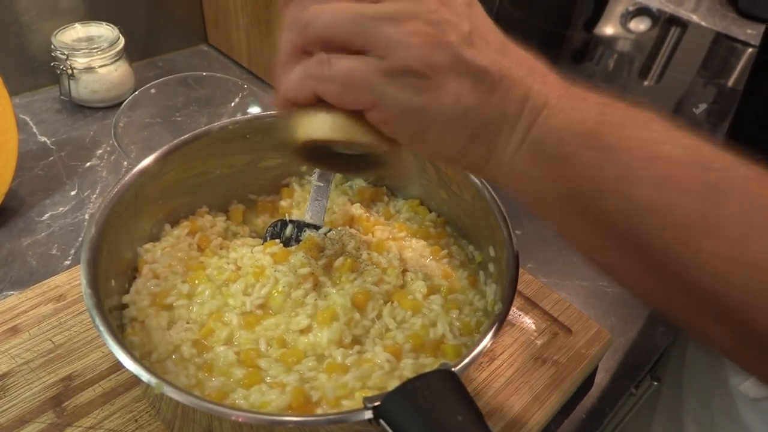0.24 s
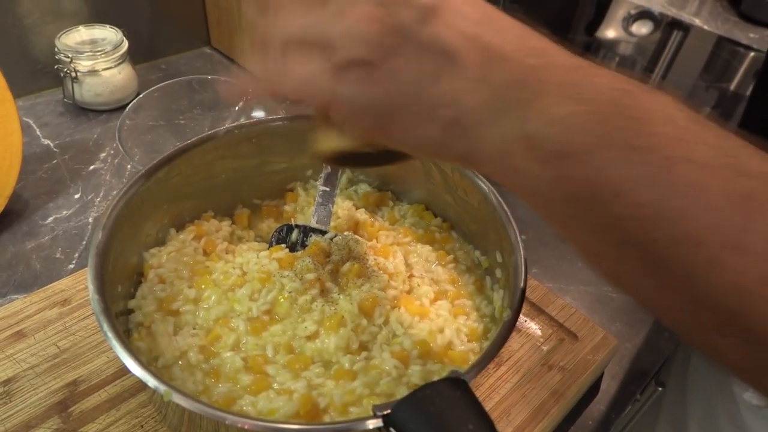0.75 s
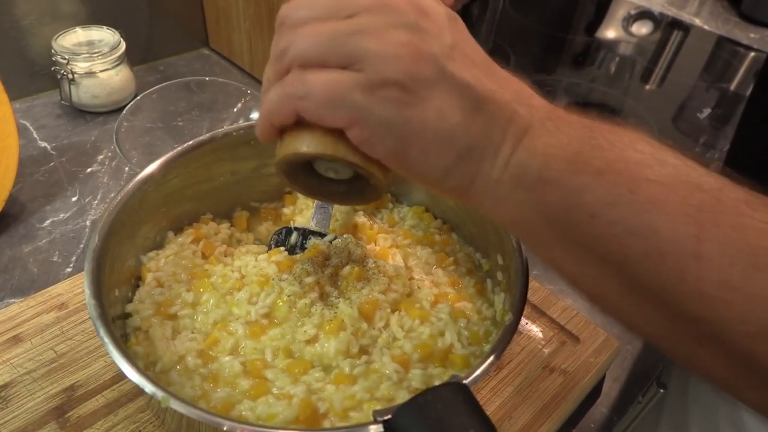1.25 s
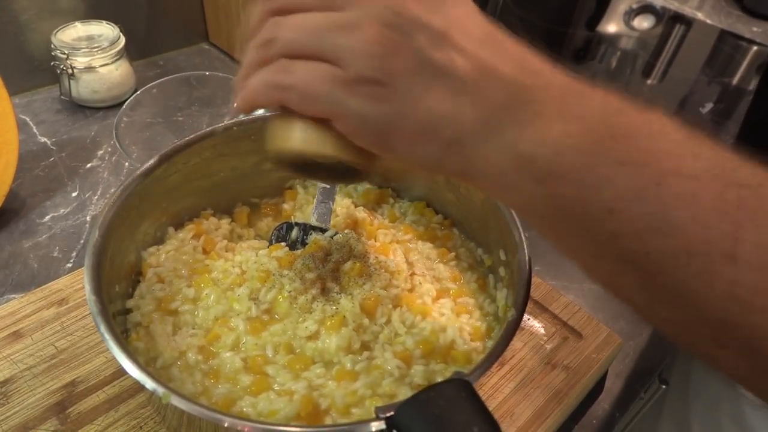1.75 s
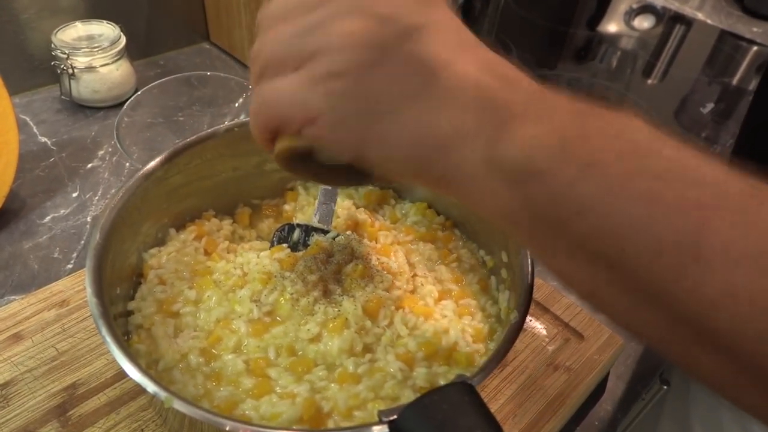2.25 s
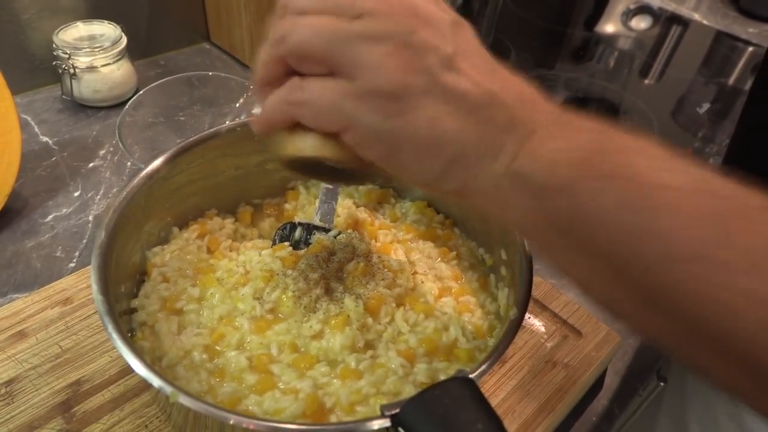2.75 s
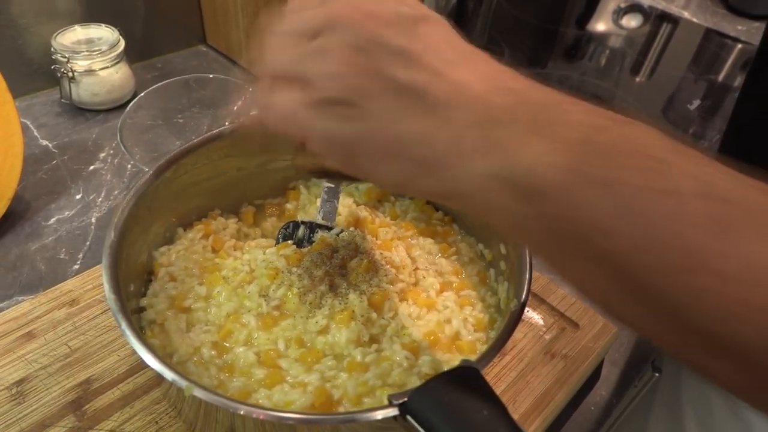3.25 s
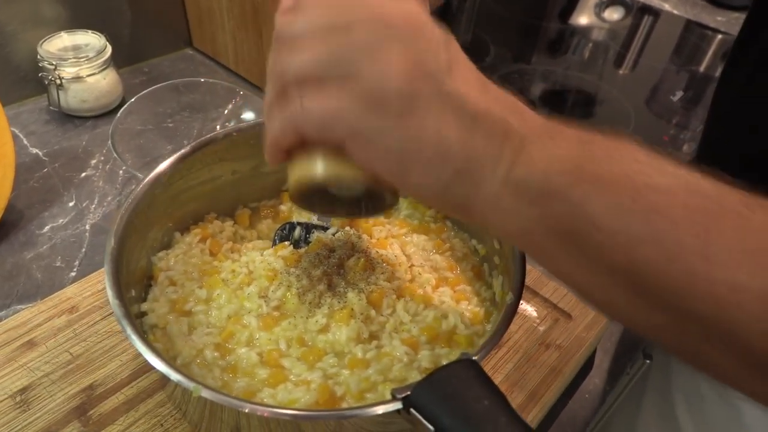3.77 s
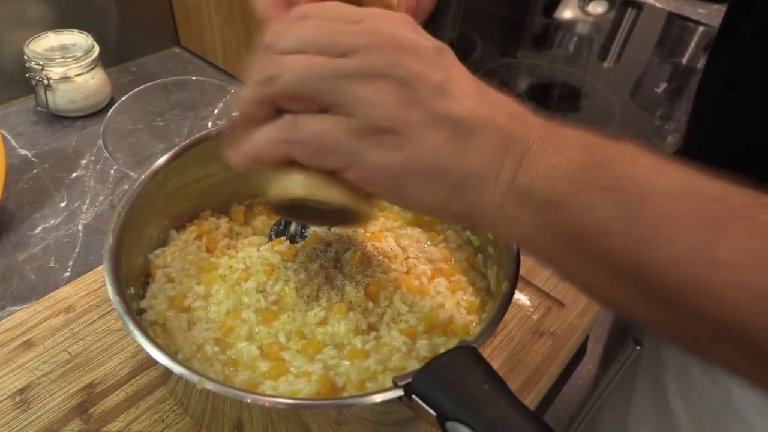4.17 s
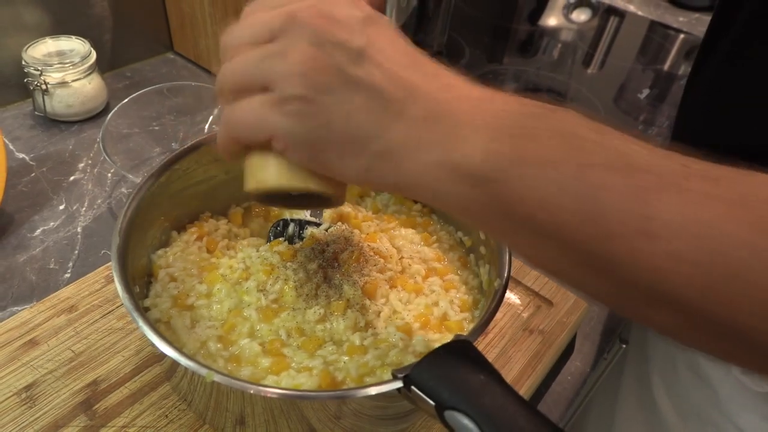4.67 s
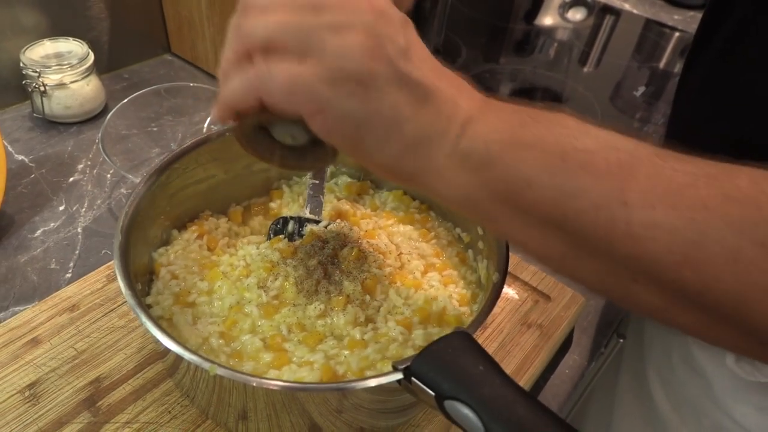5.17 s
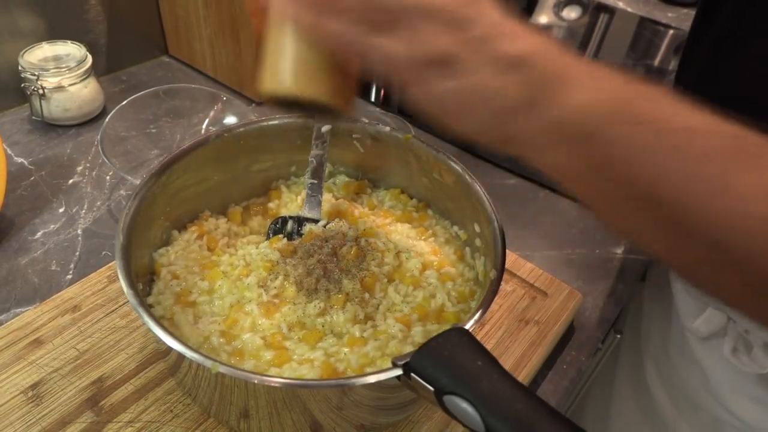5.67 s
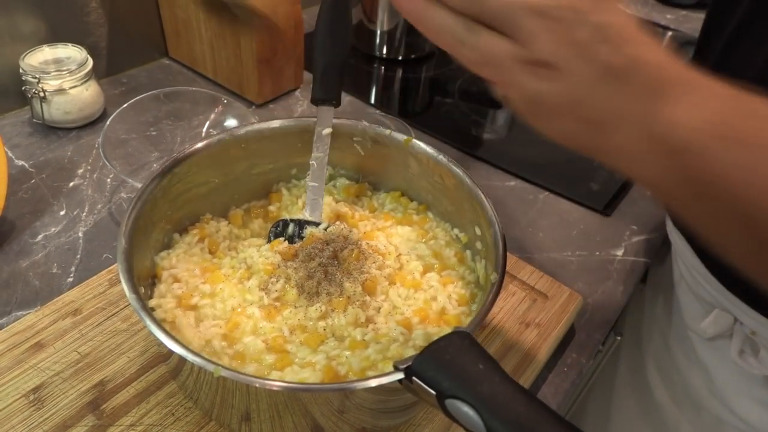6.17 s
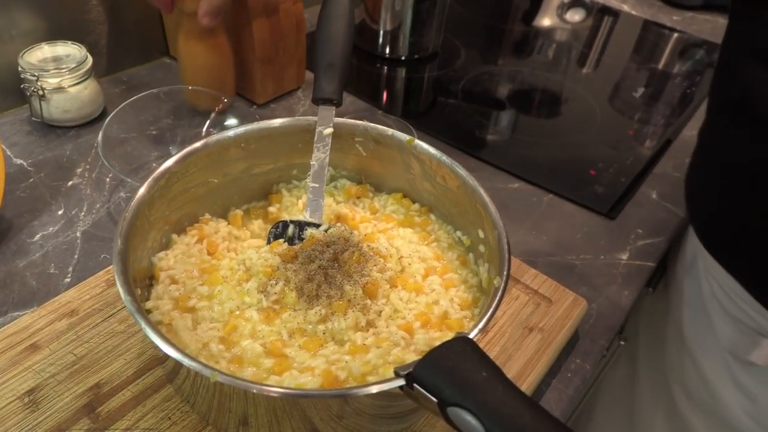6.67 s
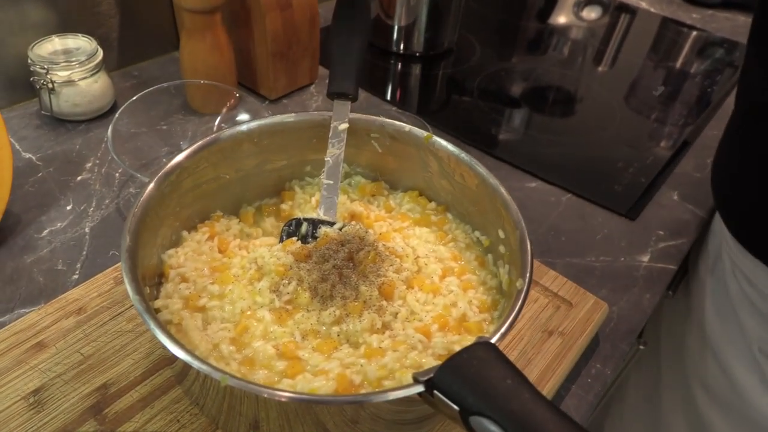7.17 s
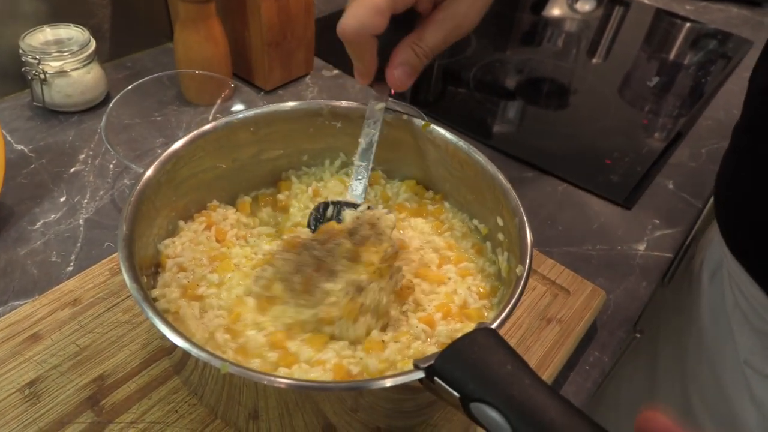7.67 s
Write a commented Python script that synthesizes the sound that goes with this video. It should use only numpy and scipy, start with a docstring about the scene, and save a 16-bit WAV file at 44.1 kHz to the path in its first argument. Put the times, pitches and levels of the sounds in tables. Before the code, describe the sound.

Peppercorns crunch rhythmically in a wooden mill, followed by two dull pats, a sharp knock on stone and a spoon stirring wet rice.

```python
"""A hard-walled kitchen, with an appliance humming far off. A wooden pepper mill is twisted sixteen
times over a pot: peppercorns crunch and crack, ringing its cavity, steel burr and wood. A palm slaps
the mill twice, it is set down on a stone counter and rocks once, then a spoon stirs sticky rice.
A close pair of microphones hears it from the right."""
import sys
import numpy as np
from scipy import signal
from scipy.fft import rfft, irfft, next_fast_len
from scipy.io import wavfile
from scipy.ndimage import uniform_filter1d, map_coordinates

SR = 44100
rng = np.random.default_rng(int(sys.argv[2]) if len(sys.argv) > 2 else 0)


def transcribe(signal):
    """Save signal, clipped to [-1, 1], as a 16-bit WAV file at the path in sys.argv[1]."""
    frames = np.atleast_2d(signal).T
    limited = np.clip(frames, -1, 1)
    pcm = np.round(limited * 32767).astype(np.int16)
    wavfile.write(sys.argv[1], SR, pcm)


N = 349051
T = np.arange(N) / SR


def amp(db):
    """Decibels to gain."""
    return 10 ** (np.asarray(db) / 20)


def unit(x):
    """Scaled to rms 1."""
    return x / np.sqrt(np.mean(x ** 2) + 1e-20)


def along(points, hz):
    """Interpolates (Hz, value) points on a log axis."""
    freqs, values = np.transpose(points)
    return np.interp(np.log(hz + 1), np.log(freqs + 1), values)


def balance(points):
    """Stereo response from (Hz, left minus right dB) points."""
    return lambda hz: amp(np.outer([.5, -.5], along(points, hz)))


def curves(rows):
    """One curve per column after the time; the first is -120 dB outside the rows."""
    times, db, *columns = np.transpose(rows)
    return [np.interp(T, times, db, -120, -120)] + [np.interp(T, times, c) for c in columns]


def fading(events, db_per_s):
    """Gain that jumps at each (s, dB), then decays."""
    return sum(amp(db - db_per_s * np.abs(T - s)) * (T >= s) for s, db in events)


def wobble(knots_per_s):
    """Smooth random curve."""
    return map_coordinates(rng.standard_normal(int(N * knots_per_s / SR) + 4), [T * knots_per_s])


def filtered(x, response):
    """Applies a complex frequency response."""
    size = next_fast_len(N + SR // 2)
    return irfft(rfft(x, size) * response(np.fft.rfftfreq(size, 1 / SR)), size)[..., :N]


def resonant(modes):
    """Response of (Hz, width Hz, dB) modes, Q at most 10; white noise keeps its level."""
    def shape(f):
        total = 0
        for k, (hz, width, db) in enumerate(modes):
            damping = 1j * f * max(width, hz / 10)
            total += (-1) ** k * amp(db) * damping / (hz * hz - f * f + damping)
        return total
    rms = np.sqrt(np.mean(abs(shape(np.linspace(0, SR / 2, 2000))) ** 2))
    return lambda f: shape(f) / rms


def grit(per_s, spread_db, clump_db):
    """Tiny random impulses of uneven size, in clumps."""
    hit = rng.random(N) < per_s / SR
    size = amp(spread_db * np.minimum(rng.exponential(size=N), 4.5) + clump_db * wobble(120))
    return unit(hit * size * rng.standard_normal(N))


def add(track, s, sound):
    """Mixes a sound into the track at time s."""
    part = track[..., round(s * SR):][..., :sound.shape[-1]]
    part += sound[..., :part.shape[-1]]


# Each row: frequency in Hz, relative noise density in dB.
AIR_SPECTRUM = [(26, -43), (45, -22), (65, -30.5), (139, -2), (275, -6.5), (662, -6.5), (866, -16),
                (1410, -12.5), (1640, -18), (2140, -15), (8410, -29.5), (9280, -29.5), (11300, -35.5),
                (15500, -56.5)]
# Each row: frequency in Hz, left-right correlation (clipped to -1..1).
AIR_CORRELATION = [(60, 0.12), (130, -0.28), (290, 0.36), (640, 0.78), (1410, -1.2), (3100, -0.48),
                   (6820, -0.03), (15000, 0.34)]
# Each row: frequency in Hz, left minus right in dB.
AIR_BALANCE = [(60, -5), (180, -3), (550, -5.5), (1650, -17.5), (4970, -6), (15000, 3.5)]


def room_air(level_db=-59.5):
    """Soft, slowly wavering noise, partly shared by both microphones."""
    def mid_side(hz):
        angle = np.arccos(np.clip(along(AIR_CORRELATION, hz), -1, 1)) / 2
        return amp(along(AIR_SPECTRUM, hz)) * [np.cos(angle), np.sin(angle)]
    mid, side = filtered(rng.standard_normal((2, N)), mid_side)
    air = filtered(np.array([mid + side, mid - side]), balance(AIR_BALANCE))
    return amp(level_db + 1.5 * wobble(2.1)) * unit(air)


# Each row: centre in Hz, width in Hz, level in dB.
HUM_BANDS = [(159.4, 11, -69), (305, 11.4, -72.5)]


def appliance_hum():
    """A distant appliance: narrow noise bands that waver."""
    out = np.zeros(N)
    for hz, width, db in HUM_BANDS:
        band = filtered(rng.standard_normal(N), lambda f: np.exp(-((f - hz) / width) ** 2))
        out += amp(db) * unit(band)
    return out


# Each row: time in s, relative level of the deep band in dB.
DEEP_RUMBLE = [(0, -74), (2.3, -67), (3.4, -72), (5.5, -67.5), (6.2, -74), (6.4, -81.5), (7.91, -75)]


def rumble(rest_db=-79.5, lag_s=.06, jolt_t60_s=.33):
    """Two low bands, mostly left; twists and knocks stir up the higher one."""
    def band(hz, log_width):
        noise = rng.standard_normal((2, N))
        return unit(filtered(noise, lambda f: np.exp(-(np.log((f + 1) / hz) / log_width) ** 2)))
    deep_db, = curves(DEEP_RUMBLE)
    shake = amp(-59.5 + .73 * (wrist_effort()[0] - FULL_CRUNCH_DB))
    shake = uniform_filter1d(shake, size=round(lag_s * SR))
    jolts = fading([(s, db - 47) for s, db, *_ in BASE_KNOCKS], 60 / jolt_t60_s)
    deep = amp(deep_db + 3 * wobble(4.9)) * band(21.2, .44)
    upper = (amp(rest_db) + shake + jolts) * amp(2.9 * wobble(6.2)) * band(90, .64)
    return (deep + upper) * amp([[5.5], [-11]])


# Each row: frequency in Hz, reverberation T60 in s.
WALL_DECAY = [(150, 0.25), (600, 0.53), (2000, 0.6), (5000, 0.47), (12000, 0.36)]


def wall_reverb(x):
    """Diffuse tails off hard walls; each 0.3 s of sound meets a new one."""
    out, step = np.zeros((2, N)), int(.3 * SR)
    for start in range(0, N, step):
        hz, t, spectra = signal.stft(rng.standard_normal((2, SR * 3 // 4)), SR, nperseg=256)
        decay = amp(-60 * t / along(WALL_DECAY, hz)[:, None])
        tail = signal.istft(spectra * decay, SR, nperseg=256)[1]
        tail /= np.linalg.norm(tail[0])
        add(out, start / SR + .005, signal.fftconvolve(x[None, start:start + step], tail, axes=1))
    # Long waves reach both microphones alike.
    out += filtered(out[::-1] - out, lambda hz: 1 / (1 + (hz / 600) ** 2)) / 2
    colour_hz_db = [(200, -7.5), (1000, -2.5), (3000, -6), (10000, -5.5)]
    return filtered(out, lambda hz: amp(along(colour_hz_db, hz)))


# Each row: frequency in Hz, left minus right in dB.
MIC_BALANCE = [(100, -6), (300, 5.5), (700, -8), (1400, -6.5), (2000, -12), (3000, -10.5), (4500, -6.5),
               (8000, -12), (15000, 4)]
# Pot and counter echoes, left list then right. Each row: delay in ms, gain in dB.
NEAR_ECHOES = [
    [(.6, -10), (1.5, -8), (2.9, 0.5)],
    [(.9, -25), (2.1, -15.5), (3.6, -12.5)],
]


def mic_pair(hz, left_lead_ms=.076):
    """Response of each capsule; small nearby things reflect only short waves."""
    treble = hz ** 2 / (hz ** 2 + 1200 ** 2)
    echoes = [1 + treble * sum(amp(db) * np.exp(-2j * np.pi * hz * ms / 1000) for ms, db in side)
              for side in NEAR_ECHOES]
    lead = np.exp(1j * np.pi * np.outer([1, -1], hz) * left_lead_ms / 1000)
    return balance(MIC_BALANCE)(hz) * lead * echoes


# Each row: start in s, level in dB.
SPOON_PUSHES = [(7.366, -51), (7.58, -68.5), (7.642, -57.5)]
# Each row: start in s, level in dB, pitch in Hz.
GRAIN_SMACKS = [(7.367, -39, 327), (7.368, -49, 2170), (7.403, -45, 7100), (7.471, -40.5, 7200),
                (7.473, -40.5, 2230), (7.525, -44.5, 4270), (7.581, -42, 4840), (7.581, -44.5, 804),
                (7.644, -40, 620), (7.646, -51, 4780), (7.655, -41.5, 1565), (7.665, -60, 10300),
                (7.698, -50.5, 8260), (7.722, -49, 5600)]


def spoon_in_rice(smack_t60_s=.013):
    """Each push rustles wetly; sticky grains let go with short pitched smacks."""
    wet = grit(per_s=9000, spread_db=1, clump_db=1.5) * fading(SPOON_PUSHES, db_per_s=98)
    out = filtered(wet, resonant([(331, 305, -3.5), (900, 1400, -6.5), (2330, 1100, -5)]))
    out += filtered(wet * amp(-15.5), resonant([(5000, 1700, .014), (7900, 2500, .0054)]))
    t = np.arange(SR // 50) / SR
    attack = np.sin(np.pi * np.clip(t / .00098, 0, .5))
    for s, db, hz in GRAIN_SMACKS:
        drift = .75 * rng.standard_normal(len(t)).cumsum() * np.sqrt(hz / SR)
        add(out, s, amp(db - 60 * t / smack_t60_s) * attack * np.sin(2 * np.pi * hz * t + drift))
    return out


# Each row: start in s, ring peak in dB, contact time in ms, tick in dB re peak.
BASE_KNOCKS = [(6.6028, -20.5, 1.25, -9), (6.8124, -4, 0.41, -27), (6.993, -24, 1.52, -39),
               (7.02, -33, 1.9, -41)]
# Each row: frequency in Hz, relative level in dB.
COUNTER_MODES = [(355, -7), (441, -3.5), (540, -2), (610, 0), (700, -1), (800, 0.5), (1000, 2), (1200, -1),
                 (1370, 4.5), (1560, 0.5), (1770, 5.5), (2090, -3), (2500, 2), (3100, -31)]
# Each row: frequency in Hz, width in Hz, relative level in dB.
RIM_MODES = [(2100, 2100, -8.5), (3200, 490, 4), (7540, 1200, -12.5)]


def counter_knocks(lowest_t60_s=.12):
    """The base rings mill and counter, duller for longer contact; its rim ticks on the stone."""
    out, ticks, t = np.zeros(N), np.zeros(N), np.arange(SR // 5) / SR
    low_cut = signal.butter(4, 330, "high", fs=SR, output="sos")  # a small object radiates little bass
    for s, db, contact_ms, tick_db in BASE_KNOCKS:
        ring = np.zeros(len(t))
        for hz, mode_db in COUNTER_MODES:
            t60_s = lowest_t60_s / (hz / COUNTER_MODES[0][0]) ** 1.45
            ring += amp(mode_db + rng.normal(0, 1) - 60 * t / t60_s) * np.sin(2 * np.pi * hz * t)
        blow = np.sin(np.pi * np.clip(t[:SR // 200] * 1000 / contact_ms, 0, 1)) ** 2
        ring = signal.sosfilt(low_cut, np.convolve(ring, blow)[:len(t)])
        add(out, s, amp(db) * ring / abs(ring).max())
        add(ticks, s, amp(db + tick_db - 60 * t / .019) * rng.standard_normal(len(t)))
    return out + filtered(ticks, resonant(RIM_MODES))


# Each row: start in s, then thump, slap and rattle levels in dB.
PALM_SLAPS = [(5.883, -28.5, -31, -44), (6.035, -27.5, -29.5, -40)]


def palm_slaps():
    """The palm slaps dully and shakes the corns; its thump reaches the left microphone most."""
    slap, thump, t = np.zeros(N), np.zeros(N), np.arange(SR // 4) / SR
    rattle = filtered(grit(per_s=6000, spread_db=1.5, clump_db=2), resonant(WOOD_MODES + BURR_MODES))
    damped = lambda hz, t60_s, wave=np.sin: wave(2 * np.pi * hz * t) * amp(-60 * t / t60_s)
    push = damped(88, .039, np.cos) * (1 - np.exp(-t / .0025))
    sway = .2 * damped(24, .3) * (1 - np.exp(-t / .017))
    for s, thump_db, slap_db, rattle_db in PALM_SLAPS:
        add(thump, s, amp(thump_db) * (sway - push) - amp(slap_db) * damped(260, .01))
        add(slap, s, -amp(slap_db) * damped(600, .0091))
        add(slap, s, amp(rattle_db - 60 * t / .17) * rattle[round(s * SR):][:len(t)])
    return slap, thump * amp([[5], [-14]])


# Each row: frequency in Hz, width in Hz, relative level in dB.
CAVITY_MODES = [(750, 74, -1), (1260, 304, 2.5), (460, 1090, -4), (1556, 96, -1)]
WOOD_MODES = [(1855, 250, -5.5), (2456, 418, -1.5), (2726, 516, 0), (3083, 342, -1), (3990, 910, -7),
              (4720, 1700, -12)]
BURR_MODES = [(4496, 1420, 4.5), (6120, 1850, 3), (7480, 700, 9.5), (9550, 6350, -2), (12780, 6700, -8)]


def mill_body(on_cavity, on_wood, on_burr, favoured_hz):
    """Forces ring the mill: wood modes near favoured_hz lead ahead, less so all around."""
    ahead = around = (filtered(on_cavity, resonant(CAVITY_MODES))
                      + amp(2.5) * filtered(on_burr, resonant(BURR_MODES)))
    for k, (hz, width, db) in enumerate(WOOD_MODES):
        mode = resonant([(hz, width, 0)])
        detuning = np.log(hz / favoured_hz) ** 2
        drive = (-1) ** k * amp(db) * on_wood
        ahead = ahead + filtered(drive * amp(-np.minimum(110 * detuning, 10)), mode)
        around = around + filtered(drive * amp(1.5 - np.minimum(25 * detuning, 3)), mode)
    return ahead, around.mean(0)


# Each row: start in s, burr level in dB, wood in dB re burr.
GRIP_RUBS = [(0.05, -43.5, 10), (0.4628, -52, -5), (0.802, -32, -4), (1.16, -36, -7), (1.513, -36, 0),
             (1.876, -39.5, 0), (2.2207, -29, 1), (2.4704, -38.5, 7), (2.924, -29.5, -2),
             (3.3133, -34.5, 6), (3.6416, -47, -9), (3.9789, -44, -6), (4.3554, -32, 0), (4.7047, -35, 0),
             (4.7222, -31, 7), (5.0696, -47, 2), (5.4036, -40.5, 4)]


def grip_rubs(rise_s=.0078, t60_s=.044, gain_db=-7.5):
    """Envelopes on burr and wood: the burr slips as the hand takes a new grip."""
    out, t = np.zeros((2, N)), np.arange(SR // 8) / SR
    envelope = amp(gain_db - 60 * t / t60_s) * (1 - np.exp(-t / rise_s))
    for s, db, wood_db in GRIP_RUBS:
        add(out, s, amp([[db], [db + wood_db]]) * envelope)
    return out


REST_DB, SLACK_DB, SLACK_END_DB, FULL_CRUNCH_DB = -54.5, -49.5, -45, -23
# Each row: bite time in s; slack, push and fade lengths in s; crunch at bite and at stop in dB;
# cavity in dB re crunch; favoured wood pitch in Hz.
WRIST_TWISTS = [(0.139, .095, 0.049, 0.071, -29.5, -25.5, -12, 2650),
                (0.484, .055, 0.078, 0.045, -45, -22.5, -12, 2820),
                (0.852, 0.047, 0.076, 0.055, -41.5, -23, -9.5, 2220),
                (1.24, 0.092, 0.039, 0.1, -28, -22, -14, 2700),
                (1.572, 0.06, 0.065, 0.061, -39.5, -24.5, -10, 2400),
                (1.914, 0.045, 0.087, 0.019, -43.5, -24, -10.5, 2340),
                (2.285, 0.073, 0.045, 0.096, -45.5, -24.5, -9.5, 2200),
                (2.622, 0.1, 0.093, 0.022, -40.5, -26.5, -9.5, 2250),
                (3.001, 0.092, 0.09, 0.026, -36, -26.5, -7, 2330),
                (3.357, .048, 0.08, 0.052, -25, -23.5, -13.5, 2400),
                (3.714, 0.072, 0.061, 0.062, -35.5, -26, -8, 2360),
                (4.062, 0.099, 0.051, 0.069, -39.5, -20, -10.5, 2360),
                (4.412, 0.09, .068, 0.027, -32, -27, -7.5, 2190),
                (4.77, .075, 0.06, 0.044, -32, -27.5, -9.5, 2400),
                (5.123, 0.072, .04, 0.054, -26, -22.5, -11.5, 2570),
                (5.463, 0.055, 0.06, 0.077, -43, -23.5, -10.5, 2640)]


def wrist_effort(bite_s=.005, slack_cavity_db=-14.5, slack_hz=2800):
    """Crunch dB, cavity dB and wood Hz as each twist takes up slack, bites, pushes and fades."""
    rows = []
    for bite, slack, push, fade, bite_db, stop_db, cavity_db, hz in WRIST_TWISTS:
        rows += [(bite - slack - bite_s, REST_DB, slack_cavity_db, hz),
                 (bite - slack, SLACK_DB, slack_cavity_db, slack_hz),
                 (bite - bite_s, SLACK_END_DB, slack_cavity_db, slack_hz),
                 (bite, bite_db, cavity_db, hz),
                 (bite + push, stop_db, cavity_db, hz),
                 (bite + push + fade, REST_DB, cavity_db, hz)]
    opening = (0, *rows[0][1:])
    settled = (rows[-1][0] + .34, REST_DB - 45, *rows[-1][2:])  # the grounds stop trickling
    return curves(sorted([opening, *rows, settled], key=lambda row: row[0]))


def grinding():
    """Tiny fractures and scrapes crunch under each twist while the burr hisses."""
    crunch_db, cavity_db, favoured_hz = wrist_effort()
    crunch_db += 4 * wobble(60) * (crunch_db < SLACK_END_DB)  # flutter in the quiet stretches
    burr_db = np.where(crunch_db > -100, -41 + .62 * (crunch_db - FULL_CRUNCH_DB), crunch_db)
    fracture = grit(per_s=2500, spread_db=.5, clump_db=1.5)
    # Each capsule faces another part of the burr.
    scrape = np.array([grit(per_s=5000, spread_db=2, clump_db=3) for side in range(2)])
    burr_rub, wood_rub = grip_rubs()
    force = (amp(crunch_db - 4.5) + wood_rub) * (fracture + amp(-4.5) * scrape)
    hiss = (amp(burr_db - 8) + burr_rub) * (fracture + amp(3) * scrape)
    return mill_body(force * amp(cavity_db), force, hiss, favoured_hz)


# Corns cracking under the burr, and jumping after the slaps.
# Each row: start in s, level in dB, cavity and burr offsets in dB, favoured wood pitch in Hz.
CORN_CRACKS = [(0.0777, -39, -3, -21, 2760), (0.0982, -30.5, -12, -20, 2690),
               (0.1378, -23.5, -16, -2.5, 3060), (0.1624, -22, -17, -15, 2400),
               (0.1804, -13.5, -37, -18, 2270), (0.4964, -32.5, -7, -20, 2920),
               (0.537, -23.5, -12.5, -29, 3100), (0.5506, -26, -17, -33, 3180),
               (0.7419, -33.5, -9.5, -15, 2760), (0.847, -34, -7.5, -15, 1950),
               (0.8677, -32, -18, -15, 2770), (0.8894, -25, -11.5, -16, 2810),
               (0.9164, -24, -10, -16, 1880), (1.1089, -44, -22, -6, 2760), (1.195, -39, -7, -8, 2950),
               (1.2341, -28, -19.5, -24, 2700), (1.2643, -24, -14, -18, 2720),
               (1.2964, -19, -18, -19, 3070), (1.5735, -34.5, -6, -9, 2760), (1.5865, -30, -17, -13, 1900),
               (1.6099, -25, -17, -13, 1830), (1.9221, -31, -8, -10, 2720), (1.9449, -27.5, -21, -11, 2530),
               (1.9664, -15.5, -23, -9, 1830), (2.198, -36, -11, -9.5, 1760), (2.303, -32, -9, -9, 2730),
               (2.3206, -20, -6, -5, 2100), (2.5653, -34, -22, -5.5, 4080), (2.5857, -39, -14, -3, 2880),
               (2.6393, -27, -7, -14, 1970), (2.6649, -25.5, -10, -14, 2720),
               (2.6847, -21.5, -13, -11.5, 2510), (2.7102, -13.5, -9.5, -15.5, 1710),
               (2.985, -34, -15, -12, 2100), (3.0075, -25.5, -12, -11, 2660),
               (3.0246, -21.5, -19, -16, 1900), (3.0789, -15, -10, -15.5, 2060),
               (3.1796, -37, 2.5, -15, 1900), (3.3585, -19, -14, -23, 1940),
               (3.3916, -15.5, -21, -29, 2570), (3.4301, -24.5, -12, -27, 2600),
               (3.5668, -27.5, -13.5, -33, 1730), (3.6164, -42, -17, -9, 2460),
               (3.6686, -42, -28, -6, 2740), (3.717, -27.5, -10.5, -12, 2550),
               (3.7518, -24.5, -15, -18, 1840), (3.7749, -18.5, -10, -12.5, 1870),
               (3.9794, -47.5, -13, 2.5, 2880), (4.0137, -27, -23, -15, 2800),
               (4.0444, -33.5, -7.5, -12, 2160), (4.0791, -26, -17, -29, 2460),
               (4.1062, -23, -6.5, -26, 2370), (4.4164, -32, -8, -11, 2270), (4.4424, -21.5, -8, -16, 1750),
               (4.4778, -17, -14, -7.5, 1920), (4.6804, -44.5, -19, -4, 2730),
               (4.776, -29.5, -4.5, -13, 2650), (4.7871, -28, -14.5, -16, 2410),
               (4.8019, -21.5, -13, -26, 2410), (5.096, -36, -14, -8, 2700),
               (5.1302, -30.5, -23, -16, 2450), (5.1583, -19, -27, -32, 2960), (5.479, -33, -10, -18, 1920),
               (5.4963, -22, -14, -18, 1820), (5.514, -17.5, -15, -2.5, 2510)]
CORN_JUMPS = [(5.8855, -30.5, -8, -8, 3140), (5.894, -33, -16.5, -6, 2660), (5.9197, -44, -20, -9, 2740),
              (6.0439, -43.5, -4, -21, 3300), (6.0557, -37, -19, 1, 3060)]


def single_corns(t60_s=.013, seat_scatter_db=3.5):
    """Each corn drives cavity, wood and burr with a noise burst from its own spot in the mill."""
    forces, favoured_hz, t = np.zeros((3, 2, N)), np.ones(N), np.arange(SR // 25) / SR
    envelope = amp(-60 * t / t60_s) * (1 - np.exp(-t / .00022))
    for s, db, cavity_db, burr_db, hz in CORN_CRACKS + CORN_JUMPS:
        shared, left, right = rng.standard_normal((3, len(t))) * envelope
        burst = np.array([shared + width * np.array([left, right]) for width in (.3, .3, .47)])
        burst *= amp(db) / np.sqrt(np.mean(shared[:SR // 500] ** 2))
        pan = amp(np.array([[.5], [-.5]]) * seat_scatter_db * rng.standard_normal())
        coupling = amp([cavity_db - 1, -3, burr_db - 5])[:, None, None]
        add(forces, s, coupling * pan * burst)
        favoured_hz[round(s * SR):] = hz
    return mill_body(*forces, favoured_hz)


def pepper_mill():
    """Crunch plus cracks, ahead and all around; the slim mill radiates little bass."""
    low_cut = signal.butter(2, 420, "high", fs=SR, output="sos")
    return [signal.sosfilt(low_cut, crunch + cracks)
            for crunch, cracks in zip(grinding(), single_corns())]


def scene():
    """Direct sound and wall reverberation at the microphones, over the background."""
    mill_ahead, mill_around = pepper_mill()
    slap, thump = palm_slaps()
    knocks = counter_knocks()
    stir = spoon_in_rice()
    direct = filtered(mill_ahead + slap + stir + knocks, mic_pair)
    to_walls = amp(-5) * (mill_around + slap) + amp(-4) * stir + amp(4.5) * knocks
    walls = filtered(wall_reverb(to_walls), balance(MIC_BALANCE))
    return direct + walls + thump + room_air() + appliance_hum() + rumble()


def record(dry):
    """The preamplifier rounds off the loudest peak; the treble is band-limited."""
    ceiling, top_hz = .95, 15900
    rounded = dry / (1 + abs(dry / ceiling) ** 6) ** (1 / 6)
    return filtered(rounded, lambda hz: hz < top_hz)


dry = scene()
out = record(dry)
transcribe(out)
```